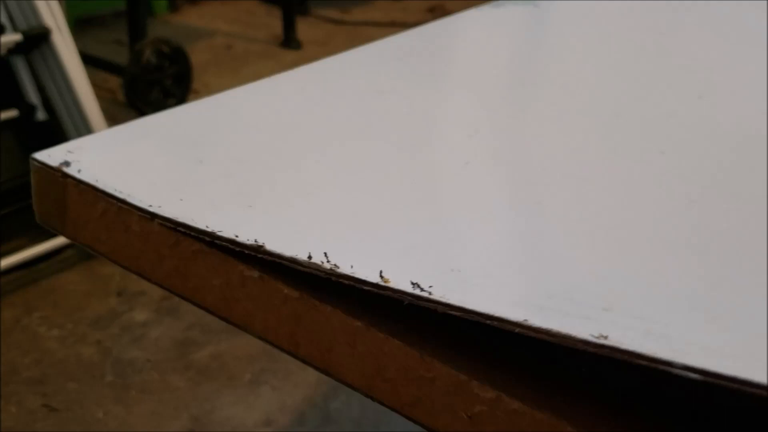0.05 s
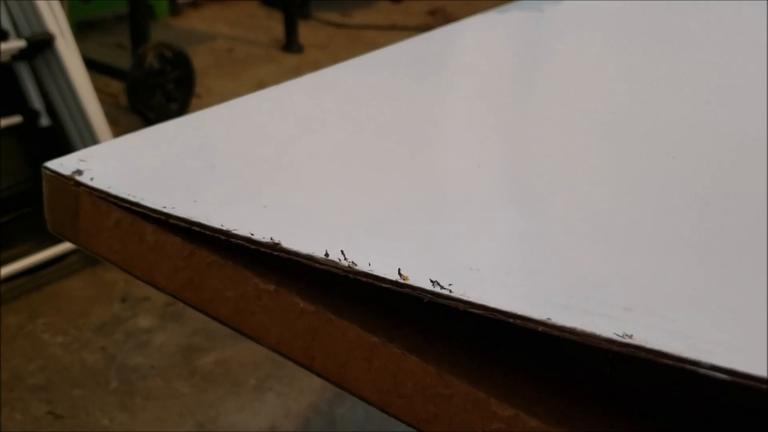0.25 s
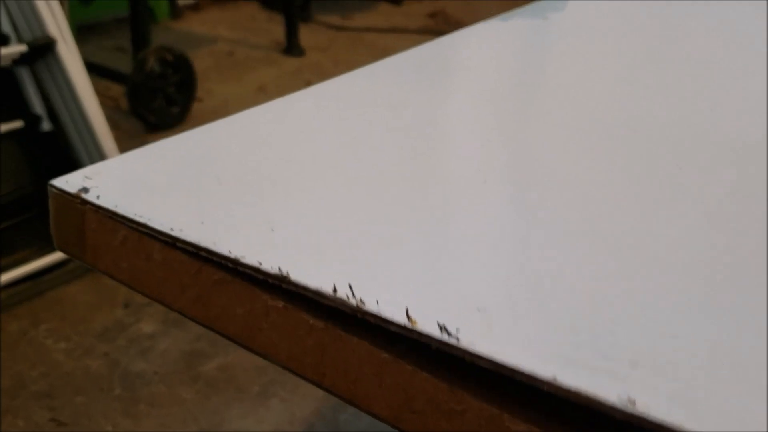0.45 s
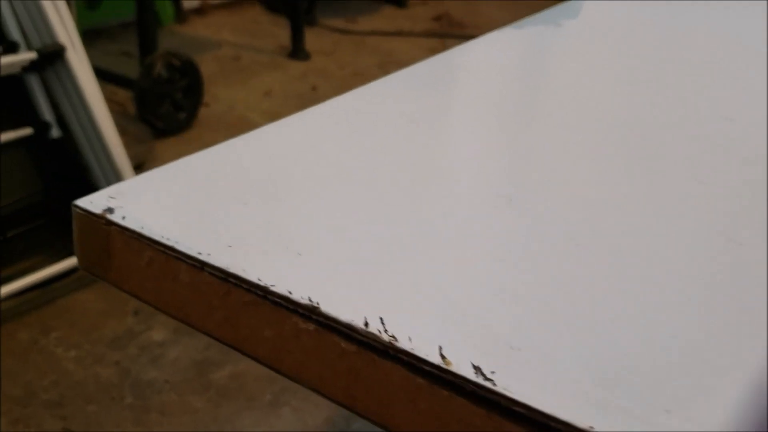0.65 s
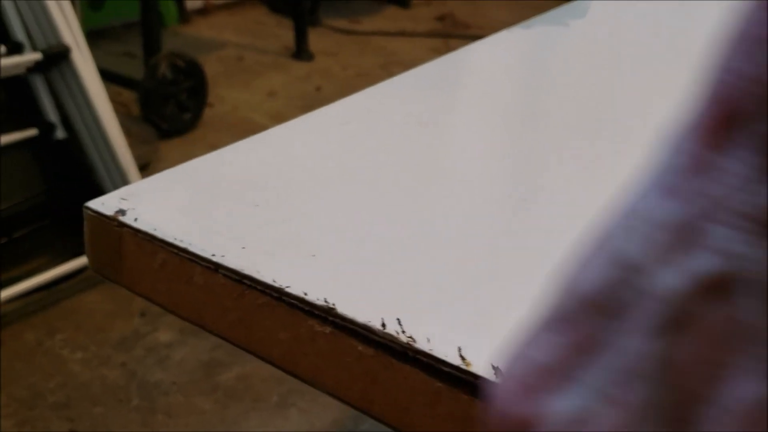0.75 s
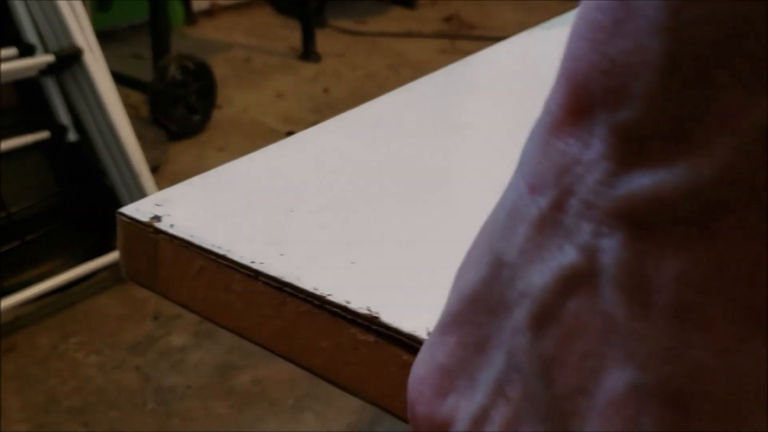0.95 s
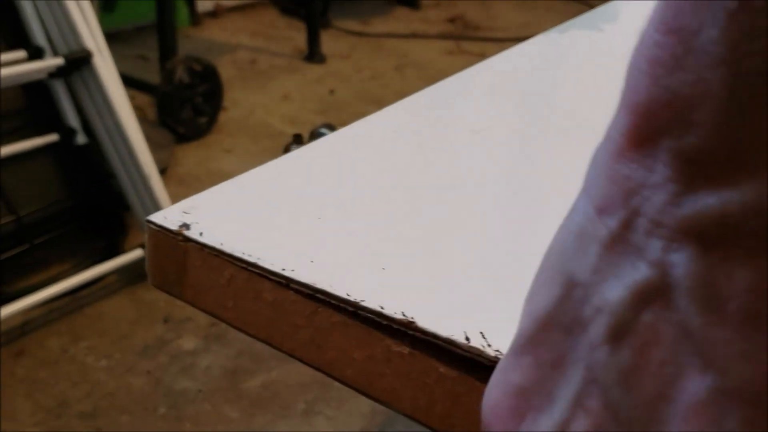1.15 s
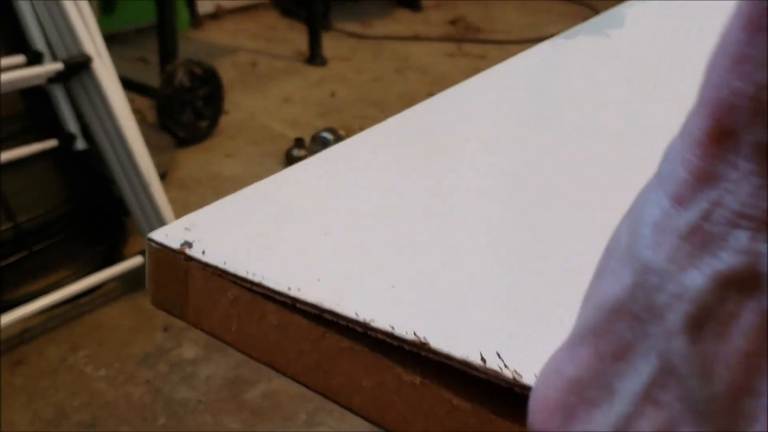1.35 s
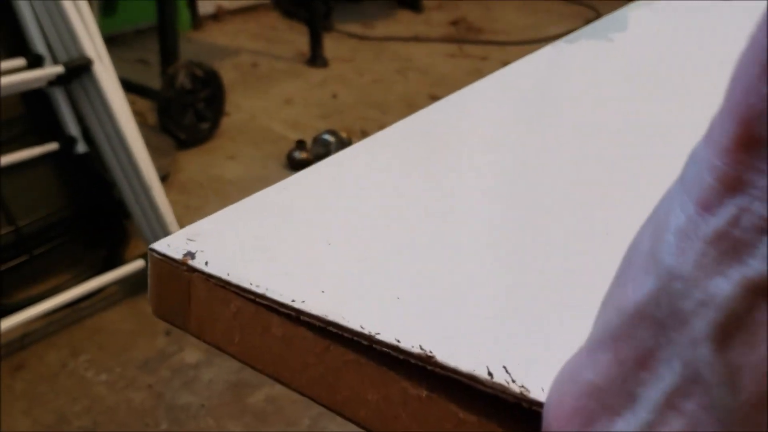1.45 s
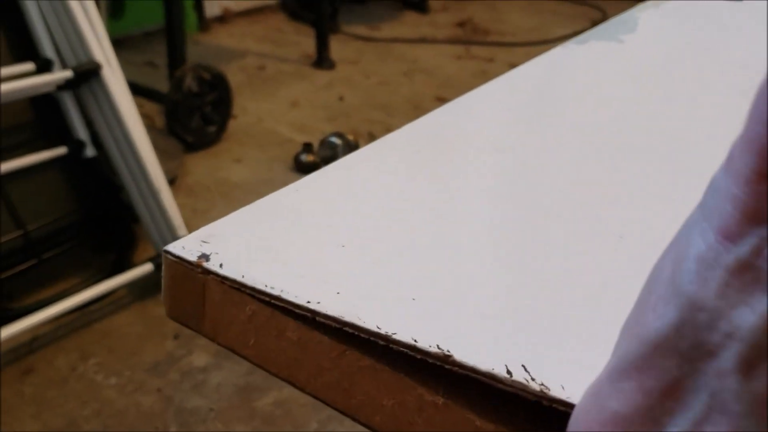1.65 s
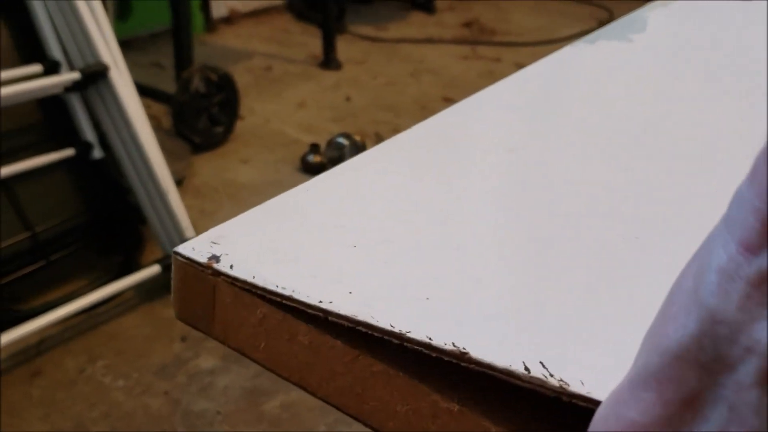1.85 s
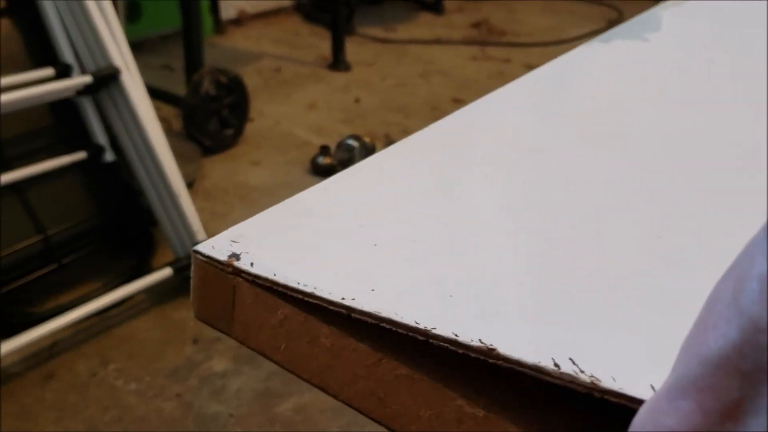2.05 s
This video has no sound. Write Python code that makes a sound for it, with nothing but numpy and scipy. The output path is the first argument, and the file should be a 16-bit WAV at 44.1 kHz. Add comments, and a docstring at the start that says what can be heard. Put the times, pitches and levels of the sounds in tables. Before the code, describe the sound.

A thin wooden door skin cracks and snaps loose, booms hollowly, then is scraped by a blade

```python
"""A putty knife pries the thin skin of a hollow door off its frame, close by in a workshop.
Tearing glue and fibres are bursts of tiny random clicks plus knocks coloured like wood; a snap lets go
and the hollow panel booms as a set of fading tones. The skin drops back with a pat, a hand slides over it
as filtered grains, then the blade clicks into the gap and scrapes along it. Quiet noise and a short tail
make the room."""
import sys
import numpy as np
from scipy import signal
from scipy.fft import rfft, irfft
from scipy.io import wavfile

SR = 44100
rng = np.random.default_rng(int(sys.argv[2]) if len(sys.argv) > 2 else 0)


def dump(signal):
    """Clip the signal to [-1, 1] and save it as 16-bit WAV at the path in sys.argv[1]."""
    limited = np.clip(np.atleast_2d(signal).T, -1, 1)
    pcm = np.round(limited * 32767).astype(np.int16)
    wavfile.write(sys.argv[1], SR, pcm)


N = 92874  # length in samples
GRAINS_PER_S, GRAIN_SPREAD_DB = 9000, 4  # average rate, usual unevenness of size
TREBLE_SAME = 0.11  # likeness of bright sounds on the two sides, 0-1


def amp(db):
    """Turns decibels into gain."""
    return 10 ** (np.asarray(db) / 20)


def unit(x):
    """Scales a sound to rms 1."""
    return x / np.sqrt(np.mean(x ** 2) + 1e-20)


def read(points, hz, axis=1):
    """Reads a column of a table on a log-frequency axis."""
    table = np.transpose(points)
    return np.interp(np.log(hz + 1), np.log(table[0]), table[axis])


def add(mix, s, sound):
    """Mixes a sound in at time s, cutting what runs past the end."""
    part = mix[..., max(round(s * SR), 0):][..., :sound.shape[-1]]
    part += sound[..., :part.shape[-1]]


def colour(x, points, size=8192):
    """Gives a sound the spectrum in a table, with a filter of unit energy that never acts early."""
    hz = abs(np.fft.fftfreq(size, 1 / SR))
    log_gain = np.log(amp(read(points, hz)))
    # minimum phase: the filter's energy comes as soon as possible
    spectrum = np.exp(np.conj(signal.hilbert(log_gain)))
    taps = np.fft.ifft(spectrum).real[:size // 2]
    taps = taps[None] / np.linalg.norm(taps)
    return signal.fftconvolve(np.atleast_2d(x), taps, axes=1)[:, :N]


def resonate(x, hz, width):
    """Rings one resonance, scaled to the level of a noise that drives it."""
    b, a = signal.iirpeak(hz, hz / width, SR)
    return signal.lfilter(b, a, x) * np.sqrt(SR / np.pi / width)


def grains(spread_db=GRAIN_SPREAD_DB):
    """Makes dense tiny slips: clicks of random size, sign and timing, at rms 1."""
    size = amp(spread_db * np.minimum(rng.exponential(1, N), 4))
    sign = rng.choice([-1, 1], N)
    happens = rng.random(N) < GRAINS_PER_S / SR
    return unit(size * sign * happens)


def spread(same, spread_db=GRAIN_SPREAD_DB):
    """Makes slips as heard on two sides, mixing shared grains with separate ones."""
    same = np.clip(same, 0, 1)
    shared = grains(spread_db)
    separate = np.array([grains(spread_db), grains(spread_db)])
    return np.sqrt(same) * shared + np.sqrt(1 - same) * separate


# colour of the quiet room noise: f/Hz, relative level per Hz/dB
FLOOR_COLOUR = [(20, -4), (70, -3.5), (150, -11), (350, -10), (1000, -6.5), (3000, -22), (8000, -31),
                (14000, -19)]
FLOOR_DB = -66.5


def room_noise():
    """Steady filtered noise, unrelated on the two sides."""
    return amp(FLOOR_DB) * colour(rng.standard_normal((2, N)), FLOOR_COLOUR)


# how the workshop's tail fades: f/Hz, time to fade by 60 dB/s, relative level of the tail/dB
ROOM_TAIL = [(60.8, 0.32, -11.5), (243.4, 0.44, -5.5), (1000, 0.41, -7.5), (3030, 0.41, -5.5),
             (7100, .44, -7.5), (15300, 0.43, -4)]
# likeness of the tail on the two sides: f/Hz, likeness/0-1
ROOM_LIKENESS = [(100, 0.8), (400, 0.63), (1200, 0), (3000, 0.02)]
ROOM_BUILD_S = 0.0023


def workshop(x):
    """A short diffuse tail of fading noise, alike on both sides mainly in the bass."""
    hz, t, z = signal.stft(rng.standard_normal((2, SR)), SR, nperseg=256)
    t60 = read(ROOM_TAIL, hz)[:, None]
    level = amp(read(ROOM_TAIL, hz, axis=2))[:, None]
    same = np.clip(read(ROOM_LIKENESS, hz), 0, 1)[:, None]
    z = np.array([z[0], same * z[0] + np.sqrt(1 - same ** 2) * z[1]])
    shape = np.exp(-np.log(1000) * t / t60) * (1 - np.exp(-t / ROOM_BUILD_S))
    shape /= np.sqrt(SR * np.mean(shape ** 2, axis=1, keepdims=True))
    tail = signal.istft(z * shape * level, SR, nperseg=256)[1]
    return signal.fftconvolve(x, tail, axes=1)[:, :N]


# left minus right at a share of 1: f/Hz, level difference/dB
SIDE_BALANCE = [(50, -3.5), (300, -1.5), (1200, -2.5), (2500, -2), (6000, 1), (9000, 5), (12000, 3.5),
                (16000, 20)]


def place(x, share, lag_s=0):
    """Leans the body of the sound right and its highest treble left; lag_s delays the left side."""
    hz = np.fft.rfftfreq(2 * N, 1 / SR)
    lean = amp(share * read(SIDE_BALANCE, hz) / 2)
    left = lean * np.exp(-2j * np.pi * hz * lag_s)
    right = 1 / lean
    return irfft(rfft(x, 2 * N) * np.array([left, right]))[:, :N]


# loudness of the sliding hand before colouring: t/s, rubbing level/dB, swish level/dB
HAND_SLIDE = [(0.598, -52.5, -64.5), (.69, -56, -58), (.735, -53, -52), (0.799, -46, -52),
              (.875, -46.5, -52), (.91, -52, -55.5), (0.971, -59, -63), (1.041, -70.5, -61),
              (1.1, -88, -87)]
# humming of the panel under the hand: f/Hz, width/Hz, level relative to the drag/dB
HUM_MODES = [(174, 20, -1), (312, 45, -7), (385, 40, -9)]
# colours of the pat, the low rub and the fine swish: f/Hz, relative level per Hz/dB
PAT_COLOUR = [(25, -39), (65, 6.5), (120, -15), (260, 4.5), (400, 1), (550, -2), (800, -13.5), (1100, -21),
              (1800, -39.5), (6000, -43)]
RUB_COLOUR = [(25, -51), (65, 1.5), (120, -2), (200, 2.5), (400, 1.5), (520, -12), (700, -13.5),
              (950, -19.5), (1600, -24.5), (5000, -71.5)]
SWISH_COLOUR = [(200, -9.5), (1500, -5.5), (4000, -5.5), (6000, -7), (8500, -8), (12500, 4), (16000, -6)]
PALM_S, PALM_DB, PALM_T60_S, PALM_PUSH_DB = .5893, -34, 0.24, -11  # levels before colouring


def hand():
    """A dull pat, then skin dragging over the panel: a low rub that sets it humming, and a fine swish."""
    t, pat = np.arange(N) / SR, np.zeros(N)
    add(pat, PALM_S, amp(PALM_DB) * np.exp(-np.log(1000) * t / PALM_T60_S))
    pat = pat * grains(spread_db=1.6)
    add(pat, PALM_S, amp([PALM_PUSH_DB]))  # one sharp push at the start
    at, rub_db, swish_db = np.transpose(HAND_SLIDE)
    touching = (t > at[0]) * (t < at[-1])
    rub = amp(np.interp(t, at, rub_db)) * touching
    swish = amp(np.interp(t, at, swish_db)) * touching
    drag = rub * grains()
    hum = sum(amp(db) * resonate(drag, hz, width) for hz, width, db in HUM_MODES)
    low_rub = amp(4.5) * colour(drag, RUB_COLOUR)
    fine_swish = colour(swish * spread(TREBLE_SAME, spread_db=3.0), SWISH_COLOUR)
    return colour(pat, PAT_COLOUR) + low_rub + hum + fine_swish


# low creaks and brief blade rings: t/s of the middle, length to each side/s, f/Hz, width/Hz, level/dB
CREAKS_AND_RINGS = [(0.177, 0.0086, 1284, 90, -33), (1.174, 0.0037, 3440, 247, -50),
                    (1.2802, 0.0031, 3030, 400, -43), (1.777, .025, 795, 89, -56)]


def creaks_and_rings():
    """Short narrow-band sounds, grains through a resonance: low creaks of the wood, brief blade rings."""
    t, out = np.arange(N) / SR, np.zeros(N)
    for s, length, hz, width, db in CREAKS_AND_RINGS:
        swell = np.exp(-((t - s) / length) ** 2)
        out += amp(db) * swell * resonate(grains(spread_db=1.9), hz, width)
    return out


# pushes on the whole panel: t/s, level/dB, thin below f/Hz, dull above f/Hz
PUSHES = [(0.028, -40.5, 30, 112), (0.225, -16, 50.3, 1800), (.262, -25.5, 40.6, 510),
          (0.5885, -38, 219, 684), (0.867, -42.5, 144, 405), (1.2797, -43, 136, 1400),
          (1.492, -46, 90.3, 205), (1.549, -56, 245, 700), (1.789, -49, 153, 620)]
# tones of the hollow panel: f/Hz, relative level/dB, time to fade by 60 dB/s
PANEL_MODES = [(60.6, -20, 0.39), (79.1, -13, .25), (117.4, 1, .19), (139.6, -7, 0.25), (218, -9, 0.15),
               (256.9, -2.5, 0.21), (280.9, -3, .24), (337.3, -0.5, 0.16), (382.1, 0, 0.2),
               (522.3, -12.5, 0.18), (608.7, -9, 0.24), (818.6, -6, 0.075), (1029.4, 6.5, 0.032),
               (1290, -8.5, 0.042)]
PANEL_RISE_S = 0.0022


def panel():
    """The hollow door rings after each push; where and how softly it is pushed selects the modes."""
    out, t = np.zeros(N), np.arange(SR) / SR
    for s, db, thin_hz, dull_hz in PUSHES:
        ring = np.zeros(SR)
        for hz, level, t60 in PANEL_MODES:
            dulling = np.hypot(1, (hz / dull_hz) ** 2)
            thinning = np.hypot(1, (thin_hz / hz) ** 2)
            fade = np.exp(-np.log(1000) * t / t60)
            ring += amp(level) * fade * np.sin(2 * np.pi * hz * t) / dulling / thinning
        add(out, s, -amp(db) * ring * (1 - np.exp(-t / PANEL_RISE_S)))
    return out


# ring of the thin steel blade: f/Hz, width/Hz, level relative to the slips/dB
BLADE_MODES = [(1935, 60, -27), (2950, 350, -17), (3940, 200, -24), (5590, 220, -24), (7300, 350, -22)]
# colour of the crackle at the edge: f/Hz, relative level per Hz/dB
CRACKLE_COLOUR = [(100, -36.5), (800, -19.5), (1800, -3.5), (2800, -12), (4200, -3.5), (5600, -4),
                  (7300, -3), (8400, -8.5), (10000, -3.5), (12500, 1.5), (16000, -8)]


def blade(x):
    """Slips at the edge: a bright crackle with a trace of the steel's ring."""
    ring = sum(amp(db) * resonate(x, hz, width) for hz, width, db in BLADE_MODES)
    return colour(x, CRACKLE_COLOUR) + ring


# strokes of the blade, levels before clumping and colouring:
# t/s, length/s, edge level/dB, wood level/dB, rise/s, release/s
STROKES = [(0, 0.016, -28.5, -30.5, 0.0032, 0.024), (0.039, 0.081, -43.5, -54.5, 0.0056, 0.085),
           (0.142, 0.0775, -32.5, -38, 0.015, 0.0079), (1.168, 0.025, -54.5, -55.5, 0.01, 0.09),
           (1.28, 0.058, -54.5, -53, 0.0055, 0.016), (1.389, 0.022, -52.5, -53.5, 0.019, 0.075),
           (1.609, 0.047, -58, -62.5, 0.015, 0.025), (1.745, 0.042, -46, -49.5, 0.01, 0.044),
           (1.86, 0.054, -63, -79, 0.014, 0.014), (1.913, .07, -52, -58, 0.024, 0.012),
           (2.002, 0.16, -54, -60.5, 0.012, .03)]
# single fibres snapping at the blade: t/s, level before the sides are set/dB
FIBRE_SNAPS = [(1.852, -41), (1.88, -35), (1.9083, -31.5), (1.934, -20.5), (1.9605, -31), (1.975, -24.5),
               (2.005, -32), (2.0735, -46)]
# colour of the rasp in the wood: f/Hz, relative level per Hz/dB
RASP_COLOUR = [(30, -35), (75, -4), (160, -9), (290, -2.5), (500, -2.5), (690, -4.5), (830, -2), (1030, -2),
               (1160, -10), (1350, -2), (1650, -11.5), (2300, -9), (3500, -15), (8000, -32)]
CLUMP_S, CLUMP_DB = 0.0064, 1.58  # how long the unevenness lasts, its rms swing


def scraping():
    """Strokes of the blade in uneven clumps, with single fibres snapping: (edge, rasp in the wood)."""
    t = np.arange(N) / SR
    edge, wood, ticks = np.zeros((3, N))
    wander = signal.lfilter([1], [1, -np.exp(-1 / CLUMP_S / SR)], rng.standard_normal(N))
    clumps = amp(CLUMP_DB * unit(wander))
    for s, length, db, wood_db, rise, release in STROKES:
        fade = np.exp(-np.maximum(t - s - length, 0) / release)
        stroke = clumps * np.clip((t - s) / rise, 0, 1) * fade
        edge += amp(db) * stroke
        wood += amp(wood_db) * stroke
    for s, db in FIBRE_SNAPS:
        add(ticks, s, amp([db]))
    ticks = ticks * amp([[4], [-3]])  # left, right
    return blade(edge * spread(TREBLE_SAME) + ticks), colour(wood * spread(0.46), RASP_COLOUR)


# fractures and blade catches, levels before colouring: t/s, length/s, crack level/dB, wood knock level/dB
FRACTURES = [(.001, 0.0038, -18.5, -31.5), (0.01, 0.0038, -32, -31.5), (0.156, 0.0016, -21.5, -56),
             (0.2014, 0.0024, -20.5, -29), (0.2186, 0.003, -35, -27), (0.2239, 0.0036, -14, -9.5),
             (0.226, 0.0026, -24.5, -10.5), (0.2292, 0.0059, -23, -19.5), (0.39, 0.015, -45, -46),
             (0.4233, .004, -38.5, -50.5), (0.54, 0.0022, -47.5, -63), (1.151, 0.0078, -50.5, -55),
             (1.174, 0.0067, -40.5, -47), (1.198, .002, -45, -68), (1.236, 0.0029, -62, -47.5),
             (1.2795, 0.0072, -37, -31.5), (1.294, 0.021, -52, -64), (1.511, 0.0025, -58, -42.5),
             (1.938, 0.0035, -41, -46.5), (2.066, 0.017, -46, -53)]
# colour of the knock in the wood: f/Hz, relative level per Hz/dB
KNOCK_COLOUR = [(30, -28), (70, 1), (160, -7), (370, -3), (600, -4), (720, -13), (850, -2.5), (1030, -5.5),
                (1160, -8.5), (1350, -7.5), (1600, -19), (3000, -27), (8000, -43)]
# decay time of the knock's ring, its level, and that of the burst in the rattle
KNOCK_RING_S, KNOCK_RING_DB, KNOCK_RATTLE_DB = .010, -9, -2


def cracking():
    """Each fracture is a burst of breaking fibres and a blow that rattles on in the wood: (edge, knock)."""
    t = np.arange(SR // 8) / SR
    edge, rattle, blows = np.zeros((3, N))
    for s, length, db, wood_db in FRACTURES:
        burst = np.exp(-(t / length) ** 2)
        ring = amp(KNOCK_RING_DB) * np.exp(-t / KNOCK_RING_S)
        add(edge, s, amp(db) * burst)
        # one click, stronger for a longer burst
        add(blows, s, amp([wood_db]) * np.linalg.norm(burst) * amp(-3.5))
        add(rattle, s, amp(wood_db) * np.maximum(amp(KNOCK_RATTLE_DB) * burst, ring))
    crackle = blade(edge * spread(TREBLE_SAME, spread_db=5.0))
    knock = colour(blows + rattle * spread(0.59, spread_db=2.2), KNOCK_COLOUR)
    return crackle, knock


def scene():
    """Door and blade in the room; the blade reaches the right side first, its highest treble leaning left."""
    edge, wood = np.add(scraping(), cracking())
    door = wood + panel() + creaks_and_rings() + hand()
    air = room_noise()
    direct = place(edge, share=1.2, lag_s=0.0002175) + place(door, share=1.0)
    tail = place(workshop(edge + door), share=0.29)
    return amp(-1.5) * (direct + tail) + place(air, share=.5)


LOW_CUT_HZ, EDGE_HZ = 44, 16050  # lower and upper limits of the band
CEILING = .75  # level that rounded peaks approach


def record(dry):
    """The recorder cuts the deep bass, rounds off the highest peaks and limits the band."""
    low_cut = signal.butter(2, LOW_CUT_HZ, "highpass", fs=SR, output="sos")
    dry = signal.sosfilt(low_cut, dry)
    rounded = CEILING * np.tanh(dry / CEILING)
    band_limit = signal.firwin(401, EDGE_HZ, window=("kaiser", 8), fs=SR)
    return signal.oaconvolve(rounded, band_limit[None], "same")


dry = scene()
out = record(dry)
dump(out)
```